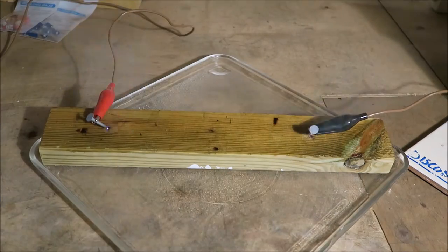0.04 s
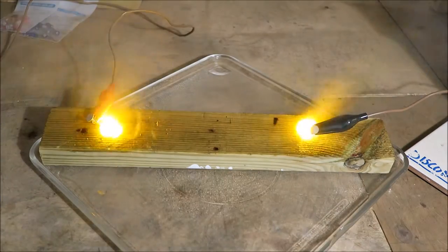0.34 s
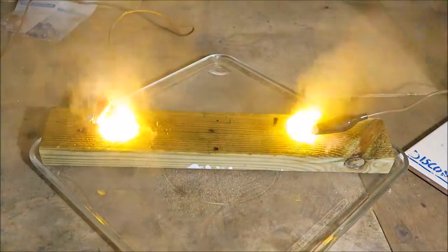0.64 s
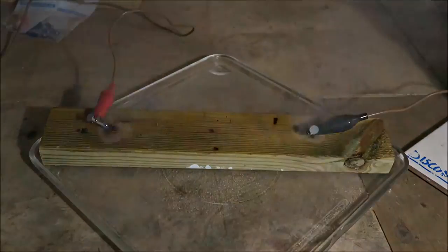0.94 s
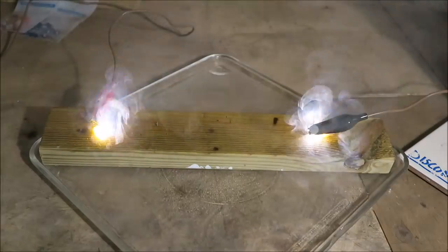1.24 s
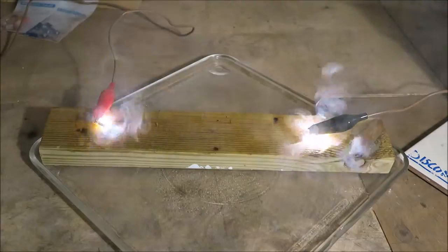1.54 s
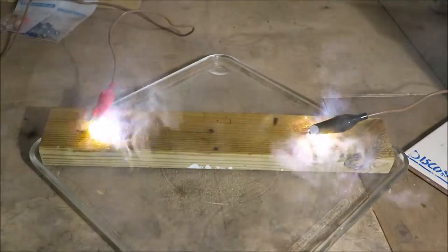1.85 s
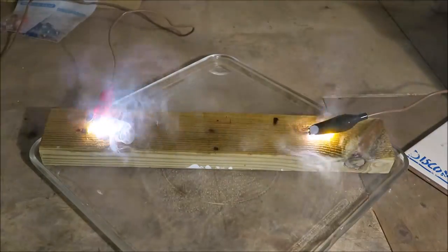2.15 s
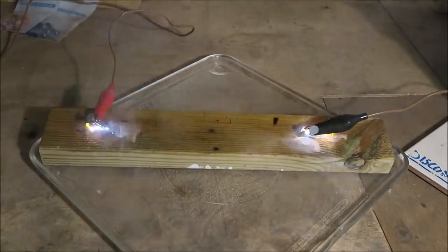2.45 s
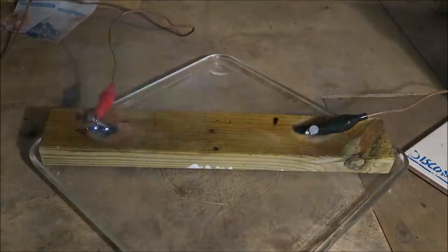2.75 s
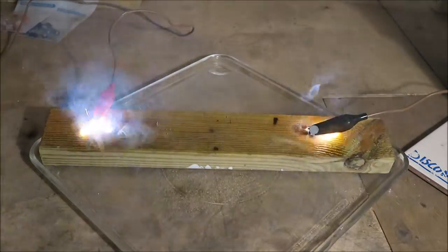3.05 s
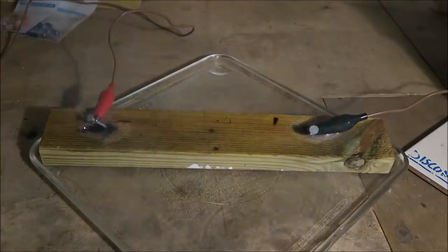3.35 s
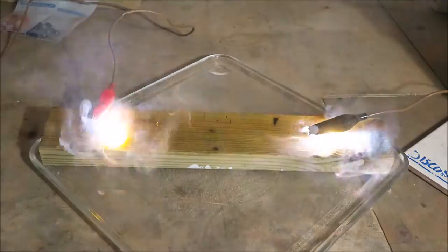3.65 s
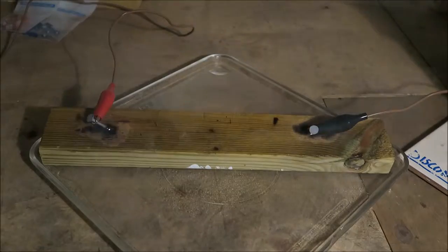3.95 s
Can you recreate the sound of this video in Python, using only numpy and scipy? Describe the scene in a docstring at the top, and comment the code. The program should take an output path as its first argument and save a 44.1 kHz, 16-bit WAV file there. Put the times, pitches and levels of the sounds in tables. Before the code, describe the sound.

High-voltage arcing crackles and buzzes on and off across wet wood, with sharp pops.

```python
"""Mains high voltage arcs from two clamps into a wet plank on a glass tray, in on-off bursts.
Each half cycle the arcs strike with a thump, sizzle and spit while current flows, and die with a
softer pulse. The long burn dries out into an open arc; arcs rasp and hot gas flutters round them.
Steam pops and squeaks, a faint spark leads into a burst, the tray rings, a small workshop
reverberates and the transformer hums below."""
import sys
import numpy as np
from scipy import signal
from scipy.fft import rfft, irfft
from scipy.io import wavfile
from scipy.ndimage import uniform_filter1d

SR = 44100
rng = np.random.default_rng(int(sys.argv[2]) if len(sys.argv) > 2 else 0)


def pcm_store(signal):
    """Save signal as 16-bit PCM."""
    levels = np.round(np.clip(np.atleast_2d(signal), -1, 1) * 32767)
    wavfile.write(sys.argv[1], SR, levels.astype(np.int16).T)


N = 176400

HALF_CYCLE_HZ, STRIKE_PHASE = 100.1, .68  # phase in half cycles
THUMP_DB, THUMP_SCATTER_DB, JITTER_S = -22, 2, .00019
COLLAPSE_DB, COLLAPSE_S, WANDER_S = -1.5, 0.005005, 0.0005
HUM_DB, HUM_SCATTER_DB, QUENCH_S = -23, 1.5, 0.00621
SIZZLE_DB, SIZZLE_SCATTER_DB, POLARITY_DB = -26.5, 0.38, 1.5
SIZZLE_RISE_S, SIZZLE_HOLD_S, SIZZLE_FALL_S = 0.0013, 0.0039, 0.0038
WARM_UP_DB, WARM_UP_S = -0.5, 0.0083
SPITS_PER_S, SPIT_SPREAD_DB, STEAM_SHARE_DB, SNAP_DB = 2600, 3.8, -9, 12


def undb(db):
    """Decibels to gain."""
    return 10 ** (np.asarray(db) / 20)


def unit(x):
    """Scale to rms 1."""
    return x / np.sqrt(np.mean(x ** 2))


def at(hz, table, column=1):
    """Read a column on a log-frequency axis."""
    table = np.array(table, float)
    return np.interp(np.log(np.maximum(hz, 1)), np.log(table[:, 0]), table[:, column])


def convolve(x, response):
    """Apply an impulse response; keep N samples."""
    return signal.fftconvolve(x, response)[:N]


def colour(x, spectrum, size=8192):
    """Minimum-phase filter of unit energy with the given spectral shape."""
    gain = undb(at(np.fft.rfftfreq(size, 1 / SR), spectrum))
    cepstrum = irfft(np.log(gain))
    cepstrum[1:size // 2] *= 2
    cepstrum[size // 2 + 1:] = 0
    response = irfft(np.exp(rfft(cepstrum)))
    return convolve(x, response / np.linalg.norm(response))


def clicks(times_s, sizes):
    """One impulse at each time."""
    inside = (times_s >= 0) & (times_s < (N - 1) / SR)
    return np.bincount((times_s[inside] * SR).astype(int), sizes[inside], N)


def decay(impulses, tau_s):
    """Give each impulse an exponential tail."""
    return convolve(impulses, np.exp(-np.arange(SR // 20) / SR / tau_s))


def background(noise_db=-47.5):
    """Transformer hum over quiet room noise."""
    # hum partials: f/Hz, rms level/dB
    partials = [(49.6, -41), (100.1, -52), (200.2, -61.5)]
    # room noise shape: f/Hz, level/dB
    noise_shape = [(15, -7), (28, -19), (45, -21.5), (65, 5), (115, -24), (196, -13), (400, -20),
                   (800, -25.5), (2240, -30), (6000, -35), (11500, -49), (15000, -70)]
    t = np.arange(N) / SR
    hum = sum(np.sqrt(2) * undb(db) * np.sin(2 * np.pi * (hz * t + rng.random())) for hz, db in partials)
    return hum + undb(noise_db) * colour(rng.standard_normal(N), noise_shape)


def workshop(early_db=-1.5, early_decay_s=0.014):
    """One room response: quick scatter from the bench, then a tail that is longest in the bass."""
    # reverberation: f/Hz, level/dB, t60/s
    reverb = [(100, -11.5, 1), (244, -9, 0.32), (600, -8.5, 0.29), (2000, -9, 0.22), (5000, -16.5, 0.32),
              (14000, -16, 0.3)]
    t = np.arange(SR // 2) / SR
    hz = np.fft.rfftfreq(len(t), 1 / SR)
    noise, tail = rfft(rng.standard_normal(len(t))), 0
    for low_hz in 60 * 2. ** np.arange(9):
        centre_hz = low_hz * np.sqrt(2)
        octave = irfft(noise * ((hz >= low_hz) & (hz < 2 * low_hz)), len(t))
        fade = np.exp(-np.log(1000) * t / at(centre_hz, reverb, column=2)) * np.clip(t / 0.01, 0, 1)
        tail = tail + undb(at(centre_hz, reverb)) * fade / np.linalg.norm(fade) * octave
    early = rng.standard_normal(len(t)) * np.exp(-t / early_decay_s)
    highpass = signal.butter(2, 900, "high", fs=SR, output="sos")
    return tail + undb(early_db) * signal.sosfilt(highpass, early / np.linalg.norm(early))


def tray(crackle, ring_db=-3):
    """The crackle plus the brief ring it excites in the glass."""
    # glass modes: f/Hz, level/dB, t60/s
    modes = [(2170, -6, .04), (2412, -4, .05), (2573, -2, .035), (2792, -3, .05), (3257, -3, .04),
             (3669, -1, .04), (4070, -1, .035), (5070, -5, .03)]
    t = np.arange(SR // 4) / SR
    ring = 0
    for hz, db, t60_s in modes:
        rate = np.log(1000) / t60_s
        ring = ring + undb(db + ring_db) * 2 * rate / SR * np.exp(-rate * t) * np.cos(2 * np.pi * hz * t)
    return crackle + convolve(crackle, ring)


def squeaks(length_s=.011, waver_depth=.04):
    """Steam escaping through the wood grain whistles briefly on an unsteady pitch."""
    # whistles: t/s, f/Hz, level/dB
    whistles = [(0.867, 3520, -19.5), (3.363, 5120, -27.5), (3.883, 3750, -32)]
    t, out = np.arange(N) / SR, 0
    for start_s, hz, db in whistles:
        waver = unit(uniform_filter1d(rng.standard_normal(N), size=64))
        pitch_hz = hz * (1 + waver_depth * waver)
        swell = np.sin(np.pi * np.sqrt(np.clip((t - start_s) / length_s, 0, 1)))
        out = out + undb(db) * swell * np.sin(2 * np.pi * np.cumsum(pitch_hz) / SR)
    return out


def pops(gain_db=-4.5, spray_decay_s=0.0015):
    """Sharp cracks with a short spray: steam pops, and a faint spark just before an arc strikes."""
    # pops and faint sparks: t/s, level/dB
    events = [(.699, 0.5), (0.7376, -3), (0.758, -5), (.818, -0.5), (.866, -3), (0.948, -6.5),
              (1.007, -10.5), (1.324, -25.5), (1.408, -4), (1.9662, -0.5), (2.194, -3), (2.353, -6.5),
              (2.373, -4.5), (2.653, -22), (2.682, -11), (2.944, -3.5), (3.334, -4.5), (3.812, 0),
              (3.882, 0), (3.922, 0.5)]
    times_s, db = np.array(events).T
    cracks = clicks(times_s, undb(db + gain_db))
    return 0.87 * cracks + 0.48 * decay(cracks, spray_decay_s) * rng.standard_normal(N)


def flame(times_s, thump, flutter_db=-28.5, rasp_db=-30.5, rasp_decay_s=0.0044):
    """The open arc rasps after each strike; hot gas flutters round it while it is fed."""
    # hot gas flutter: f/Hz, level/dB
    flutter_shape = [(90, -42.5), (170, -21), (220, -4), (270, 5), (350, 7), (460, -6.5), (600, -7.5),
                     (1200, -44.5)]
    # open arc rasp: f/Hz, level/dB
    rasp_shape = [(200, -11), (500, -1), (800, -3.5), (1050, -2), (1700, -6.5), (2500, -9), (3400, -3.5),
                  (6000, -11.5), (10000, -23), (15000, -53)]
    strikes = clicks(times_s, thump)
    fed = convolve(strikes, np.ones(int(SR / HALF_CYCLE_HZ)))
    flutter = colour(fed * rng.standard_normal(N), flutter_shape)
    rasp = colour(2 * decay(strikes, rasp_decay_s) * rng.standard_normal(N), rasp_shape)
    return undb(flutter_db) * flutter + undb(rasp_db) * rasp


def half_cycles():
    """Strike time and gains of thump, hum and sizzle for each mains half cycle."""
    # arc bursts: t/s, length/s, thump/dB, hum/dB, sizzle/dB
    bursts = [(0.0, .13, -8, -2, 4), (.346, .68, -6, 0, 2.5), (1.176, .06, -1, -11, -5),
              (1.336, .12, 1, -6, -1), (1.565, .10, .5, -11, -5.5), (1.785, .06, 1, -11, -4.5),
              (1.915, .17, 0, -8, -2.5), (2.124, .09, -1, -7, -3), (2.224, .05, .5, -13, -11),
              (2.294, .11, 1, -9, -8), (2.434, .01, -3, -16, -9), (2.464, .08, 0, -12, -6.5),
              (2.564, .04, 1, -9, -7), (2.624, .01, -1, -16, -8), (2.654, .01, -1, -16, -7),
              (2.674, .03, 0, -9, -4), (2.744, .05, 0, -11, -7), (2.894, .09, 0, -9, -6),
              (3.044, .11, 0, -9, -6), (3.274, .01, 0, -16, -1), (3.304, .10, -1, -11, -5),
              (3.484, .01, 1, -14, -2), (3.594, .02, .5, -8, 0), (3.694, .28, -1, -3, 1)]
    # offsets as the long burn dries out, end rows held outside it: t/s, sizzle/dB, thump/dB, hum/dB
    drying = [(.34, 3, -2, 0.5), (.48, 3, -9, -1.5), (.575, 5.5, -4.5, 0.5), (.63, 0, -2, 0.5),
              (.75, 3.5, -10, 0), (.85, -2.5, -3.5, -2.5), (.92, -1, -2, -5), (1.02, -12, -2.5, -13),
              (1.15, 1.5, -4.5, 3.5)]
    k = np.arange(-1, int(N / SR * HALF_CYCLE_HZ) + 1)
    times_s = np.maximum((k + STRIKE_PHASE) / HALF_CYCLE_HZ, 0)
    gains = np.zeros((3, len(k)))
    for start_s, length_s, *db in bursts:
        first = np.round(start_s * HALF_CYCLE_HZ - STRIKE_PHASE)
        on = (k >= first) & (k < first + max(1, np.round(length_s * HALF_CYCLE_HZ)))
        gains[:, on] = undb(db)[:, None]
        gains[2, on] *= undb(WARM_UP_DB * np.exp(-(times_s[on] - start_s) / WARM_UP_S))
    knots_s, *offsets_db = np.array(drying).T
    sizzle_db, thump_db, hum_db = (np.interp(times_s, knots_s, db) for db in offsets_db)
    scatter = rng.standard_normal((len(k), 3)).T
    thump_db += THUMP_SCATTER_DB * scatter[0]
    hum_db += HUM_SCATTER_DB * scatter[1]
    sizzle_db += SIZZLE_SCATTER_DB * scatter[2] + POLARITY_DB * np.cos(np.pi * k)
    return times_s, gains * undb([thump_db, hum_db, sizzle_db])


def buzz(times_s, thump, hum):
    """Air expands at each strike and falls back at the quench, whose timing wanders with arc length."""
    # strike pulse: f/Hz, level/dB
    thump_shape = [(40, -44.5), (100, -7), (150, -10.5), (200, 1.5), (290, -4), (400, -11.5), (550, -17),
                   (900, -23), (1600, -34), (5000, -65)]
    # quench pulse: f/Hz, level/dB
    hum_shape = [(40, -18), (100, -1), (150, -9.5), (200, 2.5), (300, -8.5), (400, -5.5), (550, -26),
                 (900, -36), (3000, -60)]
    scatter = rng.standard_normal((len(times_s), 3)).T
    jitter_s = JITTER_S * scatter[:2]
    wander_s = WANDER_S * np.sqrt(3) * uniform_filter1d(scatter[2], size=3)
    strikes = clicks(times_s + jitter_s[0], thump)
    collapses = undb(COLLAPSE_DB) * clicks(times_s + COLLAPSE_S + wander_s, thump)
    quenches = clicks(times_s + QUENCH_S + jitter_s[1] + .4 * wander_s, hum)
    thumping = undb(THUMP_DB) * colour(strikes + collapses, thump_shape)
    humming = undb(HUM_DB) * colour(quenches, hum_shape)
    return -(thumping + humming) * np.sqrt(SR / HALF_CYCLE_HZ)


def sizzle(times_s, gain):
    """A snap at each strike, then tiny spits and steam while current flows."""
    age_s = np.arange(SR // 50) / SR
    rise = 1 - np.exp(-age_s / SIZZLE_RISE_S)
    fall = np.exp(-np.maximum(age_s - SIZZLE_HOLD_S, 0) / SIZZLE_FALL_S)
    sizes = undb(SPIT_SPREAD_DB * np.minimum(rng.exponential(size=N), 3.6))
    spitting = rng.random(N) < SPITS_PER_S / SR
    spits = unit(spitting * sizes * np.sign(rng.standard_normal(N)))
    steam = undb(STEAM_SHARE_DB) * rng.standard_normal(N)
    strikes = clicks(times_s + JITTER_S * rng.standard_normal(len(times_s)), gain)
    current = convolve(strikes, rise * fall)
    return undb(SIZZLE_DB) * (current * (spits + steam) + undb(SNAP_DB) * strikes)


def scene():
    """Each clamp has its own sizzle and room paths; only the treble spreads wide."""
    # sizzle and pop shape: f/Hz, level/dB
    crackle_shape = [(80, -31.5), (250, 3.5), (500, 0), (850, 2.5), (1700, -1.5), (2500, -1), (4000, -1),
                     (6500, -3), (9000, -8), (12300, -5.5), (13300, -13.5), (15500, -25)]
    # stereo width: f/Hz, side gain/dB
    width = [(60, -29), (300, -11), (1000, -9.5), (2500, -34.5), (3600, -17.5), (5000, -4.5), (8000, -2),
             (15000, 3.5)]
    times_s, (thump, hum, fizz) = half_cycles()
    body = buzz(times_s, thump, hum) + flame(times_s, thump)
    crackle = sizzle(times_s, fizz) / np.sqrt(2) + pops()
    first_arc = tray(colour(crackle, crackle_shape)) + body + squeaks()
    second_arc = tray(colour(sizzle(times_s, fizz) / np.sqrt(2), crackle_shape))
    mid, side = background(), 0
    for arc in (first_arc, second_arc):
        mid = mid + arc + convolve(arc, workshop())
        side = side + convolve(arc, workshop())
    side_gain = undb(at(np.fft.rfftfreq(2 * N, 1 / SR), width))
    side = irfft(rfft(side, 2 * N) * side_gain)[:N]
    return np.array([mid + side, mid - side])


def record(dry, cutoff_hz=15500):
    """Steep low-pass on the top treble."""
    return signal.sosfilt(signal.ellip(8, .2, 80, cutoff_hz, fs=SR, output="sos"), dry)


dry = scene()
out = record(dry)
pcm_store(out)
```